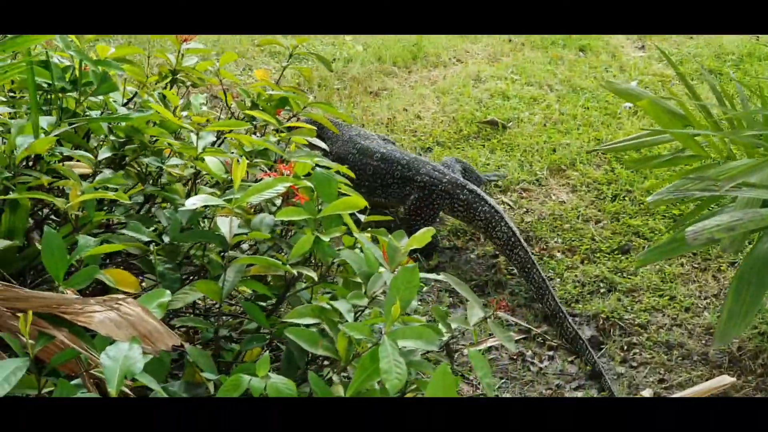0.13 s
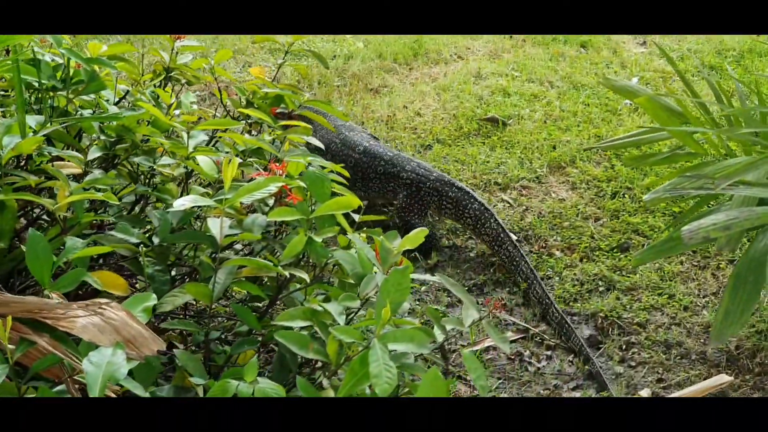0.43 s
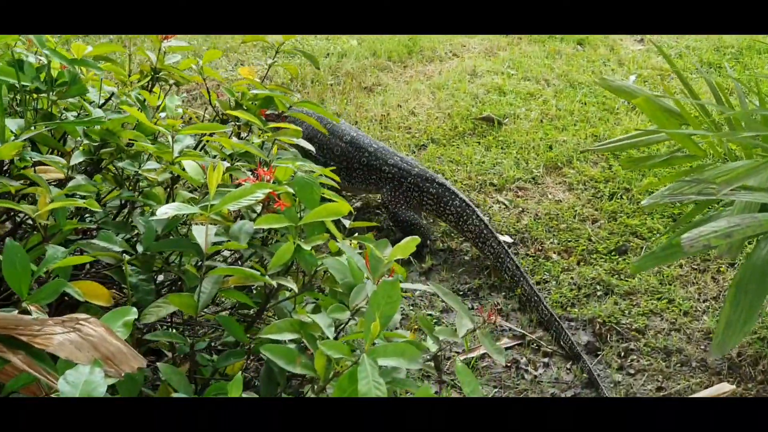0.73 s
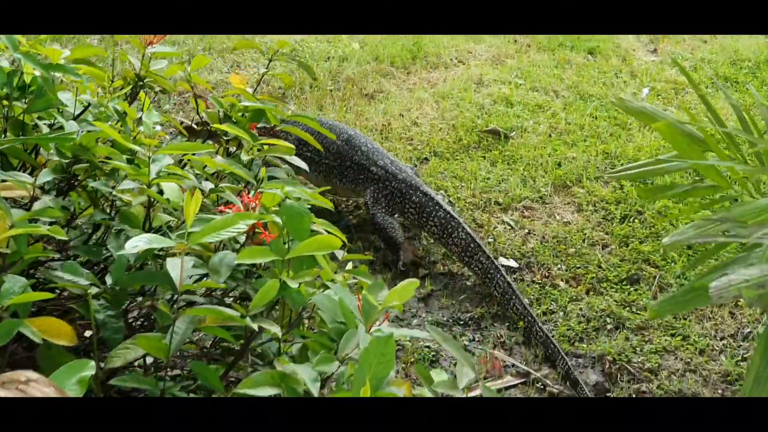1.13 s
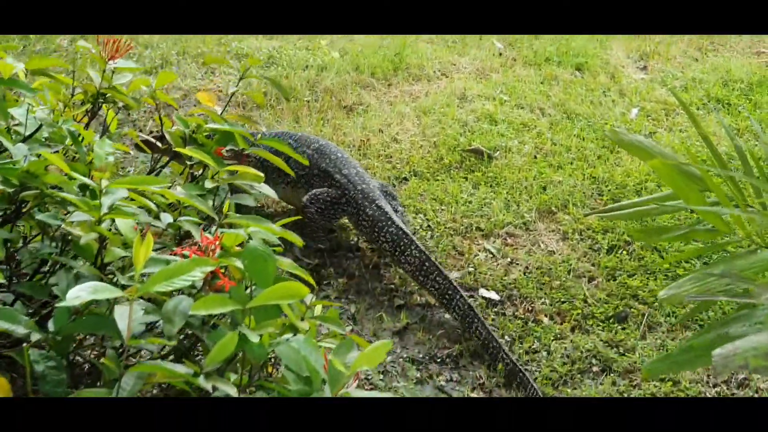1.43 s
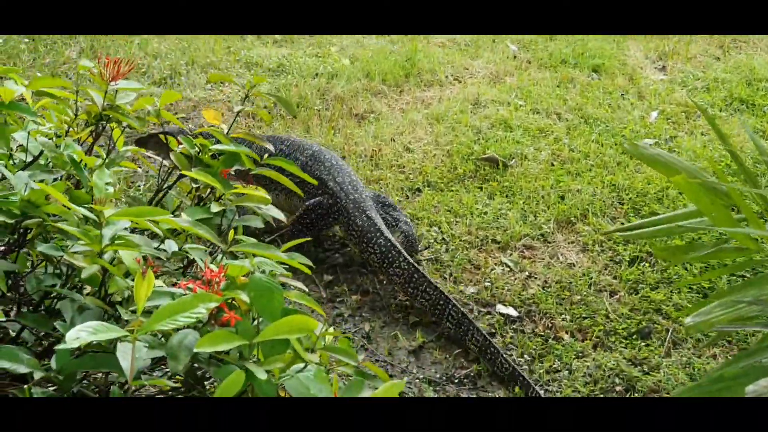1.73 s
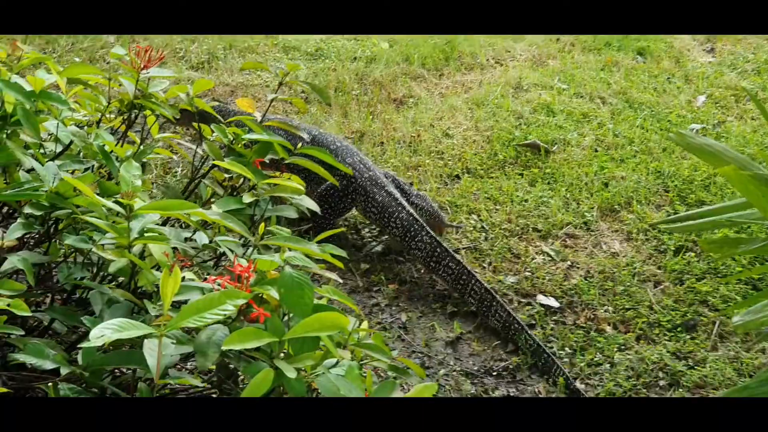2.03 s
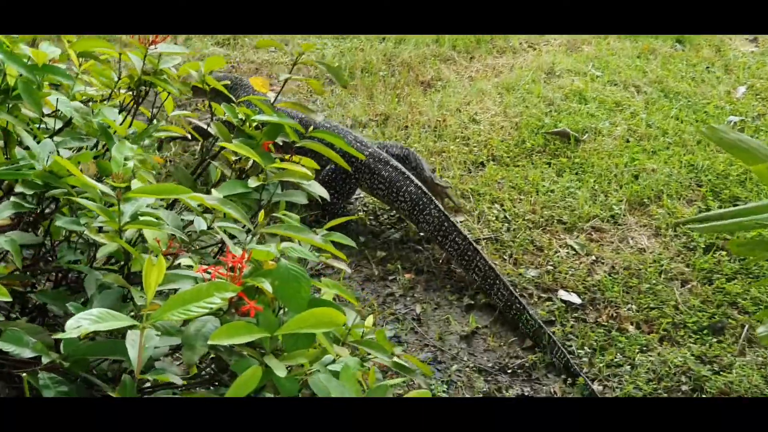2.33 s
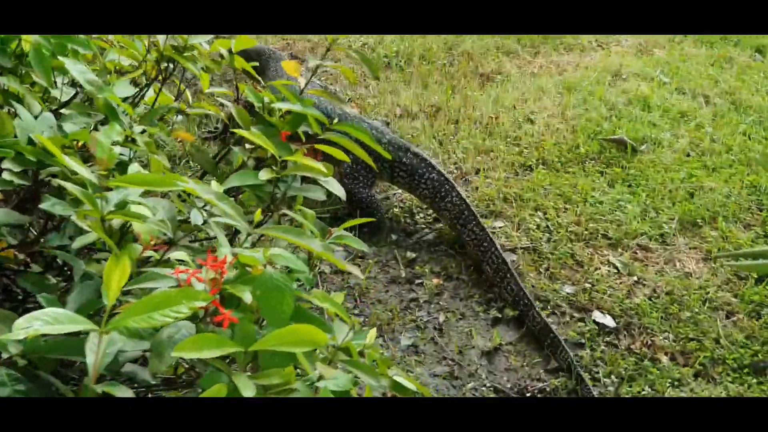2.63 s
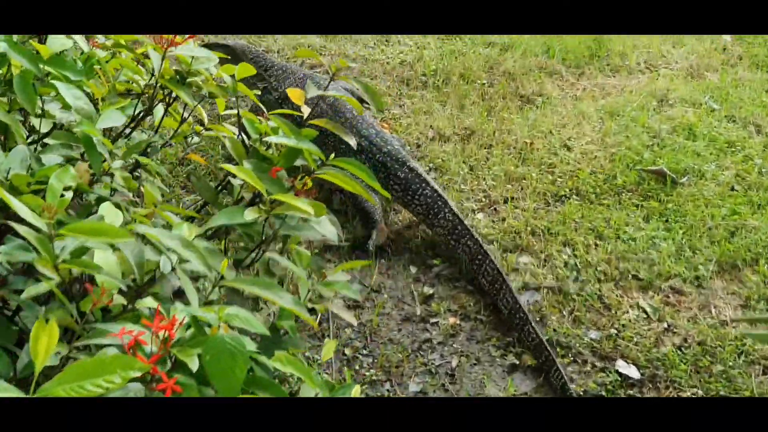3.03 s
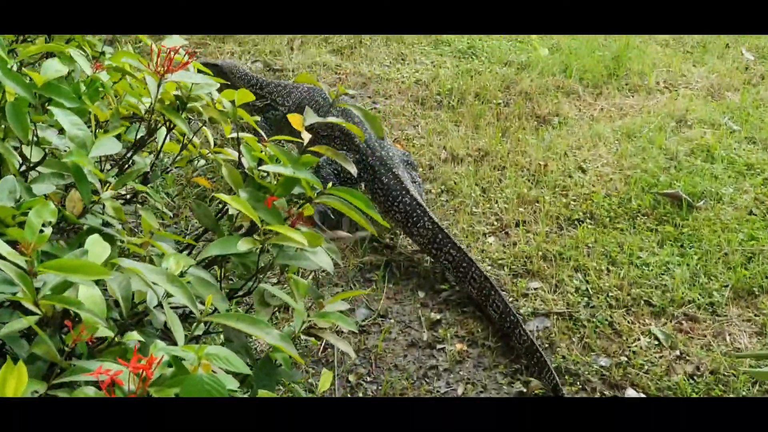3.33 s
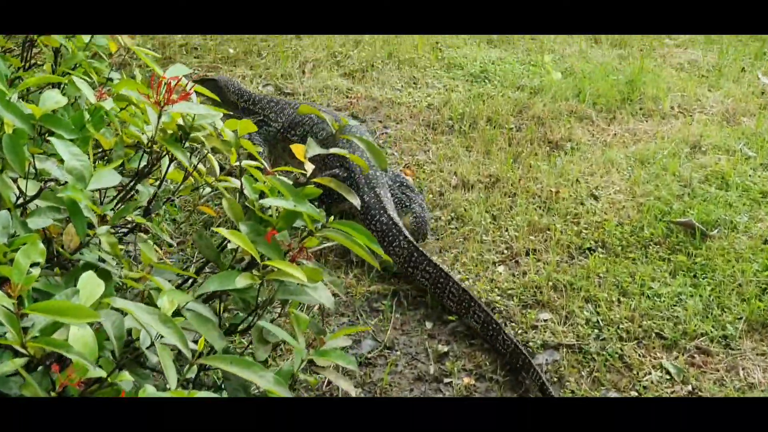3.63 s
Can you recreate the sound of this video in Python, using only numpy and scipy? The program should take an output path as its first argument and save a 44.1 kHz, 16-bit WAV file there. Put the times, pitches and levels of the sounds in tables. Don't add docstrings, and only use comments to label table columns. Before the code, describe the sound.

Short leaf scrapes and crisp twig cracks from a heavy lizard crawling through litter, first sparse, then a dense burst, then scattered ticks, over soft traffic roar and wavering low engine drones outdoors, heard in stereo, leaning right.

```python
import sys
import numpy as np
from scipy import signal
from scipy.fft import rfft, irfft, next_fast_len
from scipy.io import wavfile
from scipy.ndimage import uniform_filter1d

SR = 44100
rng = np.random.default_rng(int(sys.argv[2]) if len(sys.argv) > 2 else 0)


def wrap_up_sound(samples):
    columns = np.atleast_2d(samples).T
    tamed = np.clip(columns, -1, 1)
    steps = np.round(tamed * 32767).astype(np.int16)
    wavfile.write(sys.argv[1], SR, steps)


def attenuation_scalar(level_db):
    decades = np.asarray(level_db, float) / 20
    return 10 ** decades


N = 166257

# (frequency [Hz], level [dB])
LEAF_COLOUR = [(1100, -18), (2000, -4), (3200, -5), (4500, 2), (6700, 1.5), (7700, -10), (9500, -7),
               (15500, -10.5)]
SPLIT_HZ = 7000


def evened(x):
    return x / np.sqrt(np.mean(x ** 2) + 1e-20)


def read(points, hz):
    f, value = np.transpose(points)
    return np.interp(np.log(hz + 1), np.log(f + 1), value)


def shaped(x, gain):
    size = next_fast_len(N + 4096)
    return irfft(rfft(x, size) * gain(np.fft.rfftfreq(size, 1 / SR)), size)[..., :N]


def add(mix, s, sound):
    part = mix[..., round(s * SR):][..., :sound.shape[-1]]
    part += sound[..., :part.shape[-1]]


def resonate(x, hz, width_hz):
    turn = np.exp(2j * np.pi * np.cumsum(hz * np.ones(len(x))) / SR)
    r = np.exp(-np.pi * width_hz / SR)
    return 2 * (turn * signal.lfilter([1 - r], [1, -r], x / turn)).real


def low_share(f):
    return 1 / (1 + (f / SPLIT_HZ) ** 20)


def leaf_body(x):
    return shaped(x, lambda f: attenuation_scalar(read(LEAF_COLOUR, f)) * low_share(f))


def leaf_edge(x):
    return shaped(x, lambda f: attenuation_scalar(read(LEAF_COLOUR, f)) * (1 - low_share(f)))


def wash(colour, level_db, patchy_db, swell_db):
    # (frequency [Hz], coherence [0-1])
    coherence = [(60, 0.92), (200, 0.99), (400, 0.8), (800, 0.65), (2000, 0), (16000, 0)]
    frames, hz = N // 512 + 5, np.fft.rfftfreq(2048, 1 / SR)
    a, b, c, d, patches = rng.standard_normal((frames, 1025, 5)).T
    patches = uniform_filter1d(uniform_filter1d(patches, size=14, axis=0), size=8, axis=1)
    swell = evened(uniform_filter1d(rng.standard_normal(frames), size=30))
    same = read(coherence, hz)[:, None]
    left = a + 1j * b
    z = np.array([left, same * left + np.sqrt(1 - same ** 2) * (c + 1j * d)])
    inside = (hz >= colour[0][0]) & (hz <= colour[-1][0])
    gain_db = read(colour, hz)[:, None] + patchy_db * evened(patches) + swell_db * swell
    z *= inside[:, None] * attenuation_scalar(gain_db)
    return attenuation_scalar(level_db) * evened(signal.istft(z, nperseg=2048, noverlap=1536)[1][:, :N])


def traffic():
    # (frequency [Hz], level per Hz [dB])
    rumble_colour = [(35, -40), (50, -4.5), (70, -0.5), (95, -3), (125, -10), (180, -9), (260, -18.5),
                     (420, -29)]
    roar_colour = [(350, -5), (540, -7), (980, -3), (1200, -8.5), (3000, -19), (6500, -29.5), (8000, -37),
                   (16000, -71)]
    return wash(rumble_colour, -34, 1.3, 0.78) + wash(roar_colour, -46, 0.86, 0.51)


def drone(curve, waver_hz, waver_db):
    s, hz, db = np.transpose(curve)
    t = np.arange(N) / SR
    pitch_waver, level_waver = (evened(uniform_filter1d(uniform_filter1d(v, size=1500), size=1500))
                                for v in rng.standard_normal((2, N)))
    turns = np.cumsum(np.interp(t, s, hz) + waver_hz * pitch_waver) / SR
    level = attenuation_scalar(np.interp(t, s, db) + waver_db * level_waver)
    return np.sqrt(2) * level * np.sin(2 * np.pi * turns)


def engines():
    # (time [s], pitch [Hz], level [dB])
    low_track = [(0.0, 66, -54), (0.1, 66.35, -35), (0.38, 68.67, -37.5), (0.67, 63.77, -31.5),
                 (0.9, 64.9, -34.5), (0.95, 63.7, -25), (1.05, 64.35, -58), (1.29, 72, -34),
                 (1.63, 64.34, -37), (1.91, 63.83, -47), (2.05, 67.94, -32), (2.23, 63.27, -37),
                 (2.48, 64, -25), (2.67, 62.8, -46.5), (2.83, 65.2, -32.5), (3.23, 67.9, -34.5),
                 (3.74, 67.7, -26.5), (3.77, 67.4, -59)]
    high_track = [(0.0, 126, -54), (0.02, 124.3, -51), (0.94, 124.5, -33.5), (1.23, 125.1, -39),
                  (1.41, 125.8, -31), (1.6, 125.2, -39), (1.8, 126, -48.5), (2.9, 125.7, -44),
                  (3.18, 124.4, -39), (3.74, 126.4, -38), (3.77, 123, -44)]
    faint_track = [
        (0, 167, -61),
        (1.4, 167, -55),
        (1.9, 167, -49),
        (2.5, 167, -48),
        (3.77, 167, -70),
    ]
    return drone(low_track, 2.28, 2.26) + drone(high_track, 0.61, 0.17) + drone(faint_track, 0.38, 2.1)


def slide():
    # (time [s], centre frequency [Hz], level [dB])
    glide = [
        (.58, 4400, -74),
        (.66, 4502, -54.5),
        (.78, 4770, -59.5),
        (0.899, 5100, -94),
    ]
    s, hz, db = np.transpose(glide)
    t = np.arange(N) / SR
    hz = np.interp(t, s, hz)
    hiss = resonate(resonate(rng.standard_normal(N), hz, 1000), hz, 1000)
    return attenuation_scalar(np.interp(t, s, db)) * evened(hiss)


def scattered(dry):
    scatter_db, scatter_t60_s = -9, 0.015
    u = np.arange(4000) / SR
    tail = rng.standard_normal((2, 4000)) * attenuation_scalar(-60 * u / scatter_t60_s) * (u > .0008)
    tail = attenuation_scalar(scatter_db) * tail / np.linalg.norm(tail[0])
    return dry + signal.oaconvolve(dry, tail, axes=1)[:, :N]


def snaps():
    # (time [s], peak [dB], ring [Hz], brightness [dB])
    snap_events = [(0.0538, -27.5, 4150, -19.5), (0.995, -29, 4250, -16), (1.0063, -29, 4330, -19),
                   (1.0146, -14, 5100, -25), (1.0168, -15.5, 3820, -14.5), (1.072, -31.5, 6610, -9.5),
                   (1.097, -28, 4350, -20), (1.116, -26.5, 4900, -18), (1.1344, -34, 6460, -7),
                   (1.211, -29.5, 4690, -20), (1.222, -32, 4200, -13), (1.2348, -20, 6400, -16),
                   (1.258, -30, 4800, -20), (1.2707, -32.5, 6170, -3.5), (1.2782, -30.5, 3980, -8),
                   (1.3598, -38.5, 4180, -10), (1.3858, -31, 4470, -16), (1.396, -31, 5620, -9),
                   (1.4174, -25.5, 5560, -14), (1.497, -38, 5136, -14), (1.5113, -32.5, 4520, -16),
                   (1.5651, -35.5, 3730, -5), (1.7424, -36, 5610, -23), (1.938, -35.5, 6380, -11),
                   (2.089, -53, 2740, 4), (2.4503, -29.5, 4700, -14), (2.484, -22, 6900, -21),
                   (2.4997, -19, 5800, -18), (2.682, -31, 6820, -16), (2.8108, -28.5, 6440, -21),
                   (0.0455, -38, 4400, -18), (0.0732, -37.5, 3000, -20), (0.1155, -48, 6000, -4),
                   (0.2728, -37.5, 5880, -27), (0.336, -43, 4650, -22), (0.5347, -39, 5600, -15),
                   (0.5564, -40, 5200, -12), (0.9835, -35, 4920, -20), (1.0322, -29, 5500, -8),
                   (1.0525, -34, 5000, -15), (1.084, -35, 5500, -20), (1.1415, -39, 5500, -3),
                   (1.2357, -31.5, 3060, -14), (1.372, -39, 4500, -15), (1.6565, -46, 5500, -17),
                   (1.7868, -34, 6100, -16), (1.8074, -39, 5500, -19), (2.4482, -30, 4500, -11),
                   (2.469, -34, 4786, -26), (2.4945, -38, 6500, -2), (2.525, -39, 4300, -17),
                   (2.6818, -37, 3960, -20), (2.726, -38, 3530, -11), (2.7326, -35, 6600, -18),
                   (2.7628, -47, 6500, -5), (2.8485, -37.5, 4810, -23), (2.868, -40, 4536, -24),
                   (3.0715, -35, 6144, -22), (3.1035, -42.5, 5000, -5.5), (3.1596, -33.5, 4500, -21),
                   (3.3479, -33, 5000, -23), (1.0343, -30, 1850, -25), (2.451, -36, 2200, -25),
                   (3.3665, -34, 4483, -16), (3.682, -35, 5040, -30)]
    # (time [s], peak [dB], pitch [Hz])
    ping_events = [
        (0.608, -36, 4630),
        (3.1009, -53, 5550),
        (3.277, -35, 6400),
        (4.4, -33, 6330),
        (1.6, -49, 4480),
        (1.4185, -35.5, 6400),
        (2.4835, -30, 6800),
        (2.6815, -36.5, 6770),
    ]
    onset_s, pulse_cycles, pulse_db = .0004, .75, 4
    crack_t60_s, crack_db, crack_width_hz, crack_same = .0065, -2.5, 2600, 0.44
    ping_t60_s = .036
    t = np.arange(800) / SR
    ring, crack = np.zeros(N), np.zeros((2, 2, N))
    for s, db, hz, bright_db in snap_events:
        a, b = rng.standard_normal((2, 800))
        u = (t - onset_s) * hz - 1.5
        add(ring, s, attenuation_scalar(db + pulse_db) * np.exp(-(u / pulse_cycles) ** 2) * np.sin(2 * np.pi * u))
        fall_db = np.array([[db + crack_db], [db + bright_db + 11]]) - 60 * t / crack_t60_s
        pair = np.array([crack_same * a + np.sqrt(1 - crack_same ** 2) * b, a])
        body = [resonate(v, hz, crack_width_hz) for v in pair]
        add(crack, s + onset_s, attenuation_scalar(fall_db)[:, None] * [body, pair])
    for s, db, hz in ping_events:
        tone = resonate(resonate(rng.standard_normal(800), hz, 700), hz, 700)
        add(ring, s, attenuation_scalar(db - 1 - 60 * t / ping_t60_s) * evened(tone))
    return scattered(shaped(ring, low_share) + leaf_body(crack[0]) + attenuation_scalar(9) * leaf_edge(crack[1]))


def crackle():
    grains_per_s, spread_db, cycles = 1400, 5, 3.6
    size = attenuation_scalar(spread_db * np.minimum(rng.exponential(1, N), 3.5))
    size = size * (rng.random(N) < grains_per_s / SR)
    kind, t, out = rng.integers(0, 24, N), np.arange(200) / SR, np.zeros((2, N))
    for k, hz in enumerate(np.geomspace(2000, 14000, 24)):
        envelope = np.sqrt(hz) * hz * np.sqrt(t) * np.exp(-np.e * t * hz / cycles)
        grain = envelope * np.sin(2 * np.pi * hz * t)
        out[k % 2] += signal.oaconvolve(size * (kind == k), grain)[:N]
    return evened(out + 0.44 * out[::-1])


def friction_hiss():
    same, patchy_db = 0.094, 2
    common, *own = rng.standard_normal((3, N))
    z = signal.stft(np.sqrt(same) * common + np.sqrt(1 - same) * np.array(own), nperseg=256)[2]
    patches = rng.standard_normal(z.shape[1:])
    patches = uniform_filter1d(uniform_filter1d(patches, size=9, axis=0), size=12, axis=1)
    return evened(signal.istft(z * attenuation_scalar(patchy_db * evened(patches)), nperseg=256)[1][:, :N])


def leaves():
    # (time [s], level [dB], brightness [dB])
    drag_curve = [(0, -56.5, 0), (.14, -61, 0), (.24, -62, -8), (0.401, -58, 1.5), (.56, -57.5, 4),
                  (.72, -63.5, -0.5), (0.934, -59.5, 0), (1.17, -51.5, -2), (1.32, -59, 5.5),
                  (1.599, -52.5, 3), (1.7, -59.5, 3.5), (2.151, -56.5, 0), (2.39, -59.5, 1.5),
                  (2.75, -54, 2), (2.97, -56.5, 0), (3.2, -51.5, -0.5), (3.45, -58, 4), (3.63, -59, 0.5)]
    # (start [s], length [s], level [dB], brightness [dB])
    stroke_events = [(0.045, 0.15, -51, 0.5), (0.603, 0.045, -53, 1), (0.971, 0.066, -50.5, 0),
                     (1.018, 0.03, -33, 2), (1.044, 0.028, -44, 2), (1.07, 0.075, -46, -1),
                     (1.131, 0.037, -50.5, 13.5), (1.208, .02, -45, -3), (1.234, 0.019, -45, 7),
                     (1.266, 0.026, -46.5, 12.5), (1.346, 0.036, -52, 0), (1.396, 0.04, -49.5, 7),
                     (1.492, 0.053, -46, -4), (1.55, 0.05, -58.5, 12), (1.736, .08, -50, 2.5),
                     (1.936, 0.032, -50.5, 0), (2.086, 0.016, -56, 9), (2.446, 0.039, -44, 3),
                     (2.47, 0.039, -41, 0), (2.501, 0.035, -42.5, 3), (2.681, .07, -55, -3),
                     (2.805, 0.077, -61, -3), (3.07, 0.085, -52, 0), (3.334, 0.2, -50.5, 2.5),
                     (3.683, 0.11, -53, -1.5)]
    rise_s, fade_db, fade_curve = .002, -9, 1.5
    grain_share, flicker_db = 0.04, 1
    t = np.arange(N) / SR
    s, db, bright_db = np.transpose(drag_curve)
    power = attenuation_scalar(2 * np.array([np.interp(t, s, db), np.interp(t, s, db + bright_db)]))
    for start, length, db, bright_db in stroke_events:
        u = np.arange(0, 2 * length, 1 / SR)
        shape = np.minimum(u / rise_s, 1) * attenuation_scalar(fade_db * (u / length) ** fade_curve)
        add(power, start, (attenuation_scalar(np.array([[db], [db + bright_db]])) * shape) ** 2)
    noise = np.sqrt(1 - grain_share) * friction_hiss() + np.sqrt(grain_share) * crackle()
    flicker = evened(uniform_filter1d(rng.standard_normal(N), size=400))
    noise = noise * attenuation_scalar(flicker_db * flicker)
    body, edge = leaf_body(noise), leaf_edge(noise)
    level = np.sqrt(power) / body.std()
    return level[0] * body + level[1] * edge


def scene():
    return traffic() + engines() + slide() + snaps() + leaves()


def ports(f):
    # (frequency [Hz], level difference [dB])
    port_difference = [(60, -2), (400, -3.5), (2000, -9), (4500, -10.5), (7200, -21.5), (7900, 6),
                       (9500, 2.5), (12000, -4)]
    lag_s, edge_hz = 0.0003514, 15850
    left = attenuation_scalar(read(port_difference, f))
    pair = np.array([left * np.exp(-2j * np.pi * f * lag_s), np.ones(len(f))])
    return pair * np.sqrt(2 / (1 + left ** 2)) / (1 + (f / edge_hz) ** 300)


def roll_off(x):
    return signal.sosfilt(signal.butter(12, 16520, fs=SR, output="sos"), x)


def record(dry):
    return roll_off(shaped(dry, ports))


dry = scene()
out = record(dry)
wrap_up_sound(out)
```